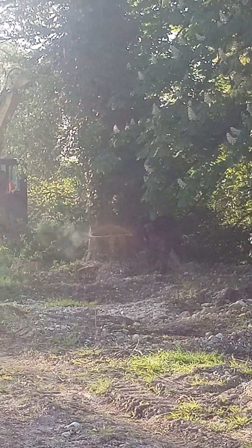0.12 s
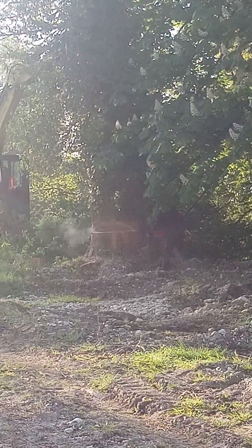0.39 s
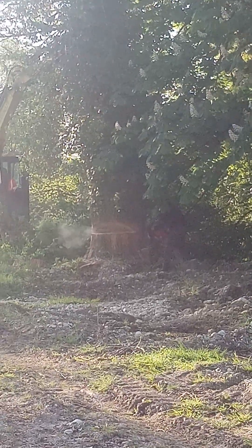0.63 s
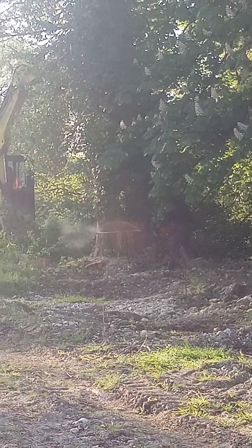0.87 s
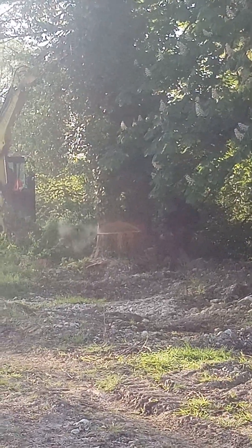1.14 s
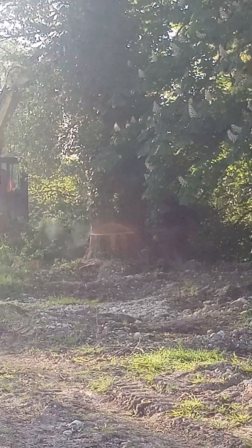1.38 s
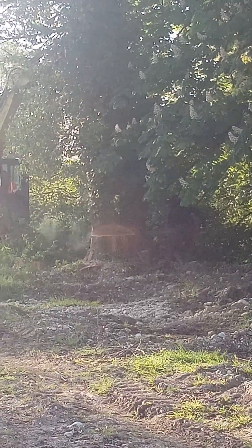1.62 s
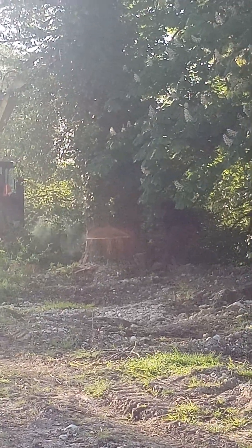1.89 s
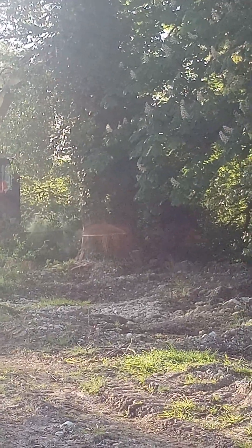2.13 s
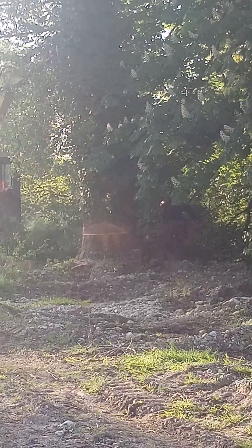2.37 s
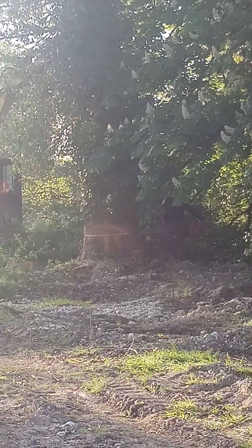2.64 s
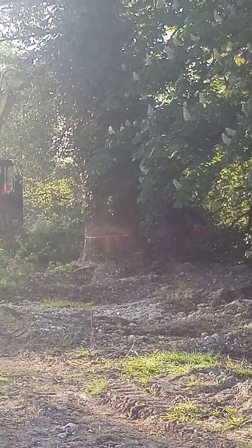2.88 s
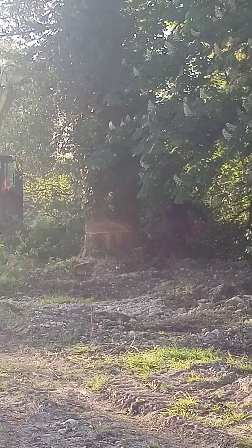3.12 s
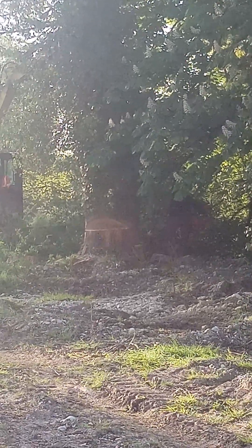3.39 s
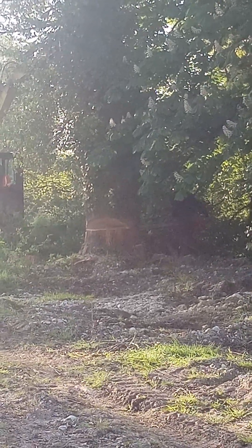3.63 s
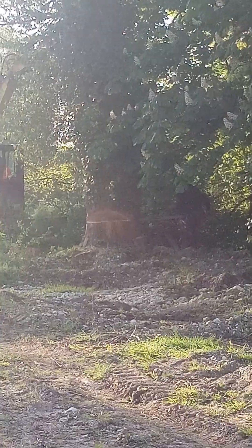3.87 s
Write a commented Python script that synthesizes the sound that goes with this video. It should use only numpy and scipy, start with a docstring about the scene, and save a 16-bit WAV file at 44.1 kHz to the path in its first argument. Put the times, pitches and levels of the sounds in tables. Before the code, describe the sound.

A chainsaw some way off revs up in a tree trunk, is released and runs down within a second or so; birds chip and trill, then loose metal rattles, over soft outdoor hiss.

```python
"""Chainsaw among the trees

A chainsaw some way off revs up in a trunk, is let go and runs down to a faint idle: sine orders of its
firing rate, muffler-shaped, with chain noise puffing at each firing. Small birds whistle, chip and trill
as gliding sines. Loose metal rattles near the work as ringing modes. Saw and birds echo off the trunks,
over a soft background hiss.
"""
import sys
import numpy as np
from scipy import signal
from scipy.io import wavfile
from scipy.ndimage import uniform_filter1d

SR = 44100
rng = np.random.default_rng(int(sys.argv[2]) if len(sys.argv) > 2 else 0)


def dump_mix(stems):
    """Bounce the given channels to the path in sys.argv[1] as a 16-bit WAV at rate SR."""
    frames = np.atleast_2d(stems).T  # one column per channel
    limited = np.clip(frames, -1, 1)  # hard clip at full scale
    pcm = np.round(limited * 32767).astype(np.int16)
    wavfile.write(sys.argv[1], SR, pcm)


def amplitude_ratio(level_db):
    """Convert a level in decibels to the matching linear amplitude (field) ratio."""
    exponent = np.asarray(level_db, float) / 20
    return 10 ** exponent


N = 176400  # samples, 4 s


def evened(x):
    """Scales a signal to rms 1."""
    return x / np.sqrt(np.mean(x ** 2) + 1e-20)


def add(mix, start_s, sound):
    """Lays a sound into the mix at a time, cut off at the end of the mix."""
    part = mix[round(start_s * SR):][:len(sound)]
    part += sound[:len(part)]


def sine(turns):
    """A sine wave of rms 1 from its phase in turns."""
    return np.sqrt(2) * np.cos(2 * np.pi * turns)


def drift(rate_hz):
    """Smooth random wandering of rms about 1: averaged noise knots joined by straight lines."""
    knots = uniform_filter1d(rng.standard_normal(int(N / SR * rate_hz * 4) + 8), size=4)
    return np.interp(np.arange(N) / SR * rate_hz * 4, np.arange(len(knots)), evened(knots))


def hiss(colour, patchy_db, band=(0, 22050)):
    """Noise of a given colour whose spectrum swells and thins in drifting patches, rms 1 inside band."""
    hz = np.fft.rfftfreq(1024, 1 / SR)
    points_hz, points_db = np.transpose(colour)
    colour_db = np.interp(np.log(hz + 1), np.log(points_hz + 1), points_db)
    real, imaginary, patches = rng.standard_normal((N // 256 + 5, 513, 3)).T
    patches = uniform_filter1d(patches, size=9, axis=0)  # across frequency
    patches = evened(uniform_filter1d(patches, size=4, axis=1))  # across time
    spectrum = (real + 1j * imaginary) * amplitude_ratio(colour_db[:, None] + patchy_db * patches)
    inside = (hz >= band[0]) & (hz <= band[1])
    share = (abs(spectrum[inside]) ** 2).sum() / (abs(spectrum) ** 2).sum()
    noise = signal.istft(spectrum, nperseg=1024, noverlap=768)[1][:N]
    return evened(noise) / np.sqrt(share)


# The run of the saw: (time [s], firing rate [Hz], firing tone level [dB], its octave level [dB],
# 11th order level [dB], fan-fin whine level [dB], chain in wood level [dB], other overtones level [dB])
SAW_RUN = [(0, 126, -35, -39, -72.5, -38.5, -44, -33),
           (.235, 132.9, -39.5, -41.5, -60, -45.5, -43.5, -39.5),
           (0.312, 147.5, -33, -42.5, -46, -28, -45.5, -33),
           (0.39, 158, -26.5, -38, -39.5, -42.5, -40, -32.5),
           (0.449, 166, -39, -34, -30, -27, -43.5, -49.5),
           (0.582, 169.4, -36.5, -45.5, -32, -31.5, -43.5, -26.5),
           (0.698, 165, -35.5, -41.5, -31.5, -27, -44.5, -23),
           (0.766, 160.8, -36.5, -26.5, -37, -29.5, -41, -26.5),
           (0.811, 157.3, -36, -56, -75, -23, -42.5, -28),
           (0.843, 142, -47.5, -53, -59, -33.5, -47.5, -35.5),
           (0.929, 106.3, -50, -50, -90, -78, -48.5, -38.5), (1.158, 65, -71, -53, -82, -91, -53, -41),
           (1.499, 46, -79, -71, -78.5, -90, -60, -49)]


def saw():
    """Engine orders locked to the firing rate, a fan whine, exhaust overtones and the chain in wood."""
    t = np.arange(N) / SR
    time_s, *columns = np.transpose(SAW_RUN)
    run = [np.interp(t, time_s, column) for column in columns]
    hz, first_db, second_db, eleventh_db, fan_db, chain_db, overtones_db = run
    fade_db = -15 * np.maximum(t - time_s[-1], 0)  # the idle sinks after the last row
    jitter = 0.00373  # rms share of the firing rate
    turns = np.cumsum(hz * (1 + jitter * drift(30.67))) / SR
    effort = (hz / hz.max()) ** 2
    tones = firing_tones(turns, {1: first_db, 2: second_db, 11: eleventh_db, 15: fan_db}, fade_db)
    overtones = exhaust(turns, hz, effort, overtones_db + fade_db / 3)
    chain = amplitude_ratio(chain_db + fade_db) * chain_in_wood(turns, effort)
    return tones + overtones + coasting(t, turns, fade_db) + pipe_ring(t) + chain


def firing_tones(turns, order_db, fade_db):
    """Sines at multiples of the firing rate; the high whines (11th and 15th) flutter in level."""
    flutter_db = 2
    out = np.zeros(N)
    for order, level_db in order_db.items():
        flutter = flutter_db * drift(45.05) if order > 2 else 0
        out += amplitude_ratio(level_db + fade_db + flutter) * sine(order * turns + rng.random())
    return out


# What the muffler lets through: (centre [Hz], half width at half amplitude [Hz], gain [dB])
MUFFLER_PASS = [(346, 66, -20), (501.7, 13, -21.5), (896, 19.4, -22.5), (2110, 280, -21), (2892, 71, -11.5)]


def exhaust(turns, hz, effort, throttle_db):
    """The other orders up to the 21st, each as loud as the muffler lets its present pitch through."""
    waver_db = 7.5  # at top speed
    growl_hz, growl_width_hz, growl_db = 1030, 320, -16.5
    full_surge = 47  # Hz per s of speeding up
    speeding_up = uniform_filter1d(np.gradient(hz) * SR, size=2000)
    surge = np.clip(speeding_up / full_surge, 0, 1) ** 2
    out = np.zeros(N)
    for order in range(3, 22):
        if order in (11, 15):  # these have levels of their own
            continue
        pipe = amplitude_ratio(-41)  # leaks through everywhere
        for centre_hz, width_hz, gain_db in MUFFLER_PASS:
            pipe = pipe + amplitude_ratio(gain_db) / (1 + ((order * hz - centre_hz) / width_hz) ** 4)
        # low overtones swell while the engine gathers speed
        pipe += surge * amplitude_ratio(growl_db) / (1 + ((order * hz - growl_hz) / growl_width_hz) ** 4)
        waver = amplitude_ratio(waver_db * drift(9.14) * effort)
        out += amplitude_ratio(throttle_db) * pipe * waver * sine(order * turns + rng.random())
    return out


def coasting(t, turns, fade_db):
    """With the throttle shut, the fourth order sings on while the engine runs down."""
    start_s, start_db, slope_db_per_s = 0.96, -55, -4
    level = (t > start_s) * amplitude_ratio(start_db + slope_db_per_s * (t - start_s) + fade_db)
    return uniform_filter1d(level, size=4000) * sine(4 * turns)


def pipe_ring(t):
    """The pipe rings as the throttle shuts: a short sine under a bell-shaped swell."""
    centre_s, half_length_s, ring_hz, peak_db = 0.81, 0.028, 818, -39
    swell = np.exp(-((t - centre_s) / half_length_s) ** 2)
    return amplitude_ratio(peak_db) * swell * np.sin(2 * np.pi * ring_hz * t)


# Colour of the chain noise: (frequency [Hz], relative density [dB])
CHAIN_COLOUR = [(120, -42), (200, -8.5), (472, -27), (655, -15), (1090, -19.5), (2230, -2), (4220, -11.5),
                (5350, -4), (7850, -35.5), (14000, -42.5), (15600, -27)]


def chain_in_wood(turns, effort):
    """Chain noise with ringing bands in it, puffing once per firing; rms 1 from 3300 to 4800 Hz
    before the bands are added."""
    puff = evened(1 + 0.5 * np.cos(2 * np.pi * turns))
    noise = hiss(CHAIN_COLOUR, patchy_db=3.5, band=(3300, 4800))
    return puff * (noise + effort * ringing_bands())


# Narrow ringing bands in the chain noise, loudest near 5300 Hz:
# (centre [Hz], width [Hz], level against the chain noise [dB])
RINGING_BANDS = [(3035, 190, 0.5), (3720, 50, -2), (4750, 120, -5), (5310, 103, 9.5)]


def ringing_bands():
    """Narrow ringing bands in the chain noise, whose levels come and go."""
    patchy_db = 4
    return sum(wandering_band(hz, width_hz) * amplitude_ratio(level_db + patchy_db * drift(20))
               for hz, width_hz, level_db in RINGING_BANDS)


def wandering_band(hz, width_hz):
    """Low-passed noise pairs turned up to a band whose pitch wanders a little, rms 1."""
    wander = 0.015  # rms share of the pitch
    b, a = signal.butter(2, width_hz / SR)  # cutoff at half the width
    angle = 2 * np.pi * np.cumsum(hz * (1 + wander * drift(9))) / SR
    i, q = signal.lfilter(b, a, rng.standard_normal((2, N)))
    return evened(i * np.cos(angle) + q * np.sin(angle))


# The calls in order: (start [s], length [s], level [dB], song shape)
BIRD_NOTES = [(0.01, 0.074, -51, "see"), (0.229, 0.052, -50, "see"), (0.442, 0.084, -57, "see"),
              (0.942, 0.1, -29, "flat"), (1.073, 0.086, -47.5, "hook"), (1.207, 0.0893, -49.5, "hook"),
              (1.487, 0.12, -52.5, "dip"), (1.623, 0.0814, -34.5, "bend"), (2.598, .15, -57.5, "arch"),
              (2.784, 0.051, -29.5, "chip"), (2.918, 0.096, -48, "sag"), (3.174, .115, -54.5, "arch"),
              (3.321, 0.038, -23.5, "chip"), (3.393, 0.12, -56.5, "arch"), (3.543, 0.035, -22.5, "chip"),
              (3.569, 0.14, -39.5, "warble"), (3.72, 0.056, -46.5, "trill"), (3.721, 0.13, -37, "rise"),
              (3.888, 0.061, -30, "low")]


def birds():
    """Single notes, plus one trill."""
    out = trill()
    for start_s, length_s, level_db, shape in BIRD_NOTES:
        sound = note(shape, length_s, level_db)
        if shape == "warble":  # hoarse: the whistle is broken up by fast chance
            sound = sound * drift(160)[:len(sound)]
        add(out, start_s, sound)
    return out


def trill():
    """A run of quick upward slides that sinks a little in pitch and level, each slightly off."""
    start_s, step_s, length_s, count = 1.729, 0.0471, 0.023, 17
    first_db, sag = -47, 0.03  # sag: share of the pitch lost over the run
    out = np.zeros(N)
    for k in range(count):
        level_chance, pitch_chance = rng.standard_normal(2)
        level_db = first_db - k / 4 + 2 * level_chance
        pitch = 1 - sag * (k / count + pitch_chance / 2)
        add(out, start_s + k * step_s, note("trill", length_s, level_db, pitch))
    return out


# Song shapes by name: (share of the note's length, pitch [Hz], level against the note's own [dB])
SONG_SHAPES = dict( see=[(0, 7705, -27), (.4, 7414, -2), (1, 7280, -8)], flat=[(0, 5120, -32),
               (.4, 5105, 2.5), (1, 5060, -13)], hook=[(0, 6400, -5), (.16, 6760, -2), (.58, 6410, -2),
               (.82, 5310, 12), (1, 4110, -21)], dip=[(0, 7500, -3), (.1, 8130, -17), (.28, 6936, 7.5),
               (1, 7510, -17)], bend=[(0, 5456, -18), (.18, 5605, 3), (.6, 5684, 4.5), (.76, 5220, 6.5),
               (1, 4105, -53.5)], trill=[(0, 4250, -12), (.75, 5000, 2), (1, 5200, -6)],
               warble=[(0, 5280, 4), (.35, 5890, -7), (.55, 5100, -4), (1, 5360, -10)],
               arch=[(0, 6900, -29), (.12, 7940, 2.5), (.55, 8370, -17), (.87, 7700, -6), (1, 6910, -21)],
               chip=[(0, 5893, -28), (.28, 5510, -10), (.42, 5290, 3.5), (.56, 4900, -19), (1, 3900, -33)],
               sag=[(0, 6790, -59), (.08, 7340, -3), (.92, 6900, 5), (1, 6790, -23.5)],
               rise=[(0, 5370, -16), (.28, 6520, 3), (.8, 6540, -1), (1, 6340, -17)], low=[(0, 4870, -36),
               (.3, 4705, -1.5), (1, 4450, -13.5)])


def note(shape, length_s, level_db, pitch=1):
    """A near-sine whistle gliding along one song shape; pitch scales its frequencies."""
    place = np.arange(0, length_s, 1 / SR) / length_s
    at, hz, shape_db = np.transpose(SONG_SHAPES[shape])
    glide_hz = pitch * uniform_filter1d(np.interp(place, at, hz), size=len(place) // 12 + 1)
    edge = np.clip(np.minimum(place, 1 - place) * 30, 0, 1)
    level = edge * amplitude_ratio(level_db + np.interp(place, at, shape_db))
    return np.sqrt(2) * level * np.sin(2 * np.pi * np.cumsum(glide_hz) / SR)


# What the loose metal rings with: (frequency [Hz], level [dB], t60 [s])
METAL_MODES = [(1428, -6.5, 0.048), (2169, 6, 0.05), (2457, 1.5, 0.17), (3093, 2.5, 0.1), (3265, 2.5, 0.1),
               (3920, -4.5, 0.12), (5344, 3.5, 0.085), (11520, -32, 0.078)]
# How hard it shakes: (time [s], rattle level [dB])
SHAKING = [(1.7, -56.5), (2.05, -52), (2.5, -44), (3, -41.5), (3.5, -41), (4, -46)]
# Single harder hits: (time [s], strength [dB])
METAL_KNOCKS = [(2.168, -49), (2.2927, -45.5), (2.4049, -48), (2.54, -35.5), (2.7533, -40), (2.9856, -42),
                (3.1025, -34), (3.3427, -41), (3.545, -43), (3.679, -45)]


def rattle():
    """Many small ticks and a few knocks; each rings the modes of the metal in its own proportions."""
    ticks_per_s, tick_spread_db, mode_spread_db, burst_db = 450, 3.5, 6.5, 4.5
    rise_s, crack_db, crack_decay_s = 0.002, -5, 0.016
    detune = 0.014  # share of the pitch
    t, ring_t = np.arange(N) / SR, np.arange(8000) / SR
    at = np.flatnonzero(rng.random(N) < ticks_per_s / SR)
    size_db = tick_spread_db * np.minimum(rng.exponential(1, (len(at), 1)), 4)
    size_db = size_db + mode_spread_db * rng.standard_normal((len(at), len(METAL_MODES)))
    knock_db = np.array(METAL_KNOCKS)[:, 1:]
    knock_db = knock_db + 3.5 * rng.standard_normal((len(METAL_KNOCKS), len(METAL_MODES)))
    attack = np.sin(np.pi / 2 * np.minimum(ring_t / rise_s, 1)) ** 2
    ticks, knocks = np.zeros(N), np.zeros(N)
    for k, (hz, level_db, t60) in enumerate(METAL_MODES):
        pieces_hz = hz * (1 + detune * np.arange(-1, 2)[:, None])  # three like pieces, not quite in tune
        rings = attack * amplitude_ratio(level_db - 60 * ring_t / t60) * np.sin(2 * np.pi * pieces_hz * ring_t)
        train = np.zeros((len(rings), N))
        train[at % len(rings), at] = amplitude_ratio(size_db[:, k] + burst_db * drift(7)[at])
        ticks += signal.oaconvolve(train, rings, axes=1)[:, :N].sum(0)
        for row, (time_s, _) in enumerate(METAL_KNOCKS):
            add(knocks, time_s, amplitude_ratio(knock_db[row, k]) * rings.mean(0))
    # each knock starts with a short crack of noise
    crack_noise = hiss(CHAIN_COLOUR, patchy_db=0.49)
    crack_shape = np.minimum(ring_t / rise_s, 1) * np.exp(-ring_t / crack_decay_s)
    for time_s, strength_db in METAL_KNOCKS:
        piece = crack_noise[round(time_s * SR) - 8000:][:8000]
        add(knocks, time_s, amplitude_ratio(strength_db + crack_db) * crack_shape * piece)
    slow = np.sqrt(uniform_filter1d(ticks ** 2, size=8000) + 1e-12)  # running rms
    shake = amplitude_ratio(np.interp(t, *np.transpose(SHAKING), left=-90))
    return shake * ticks / slow + knocks


def trees(x, t60):
    """Scattered echoes off trunks: sparse taps of random sign, dying away over t60 seconds."""
    taps = np.zeros(SR)
    at = np.arange(500, SR - 20, 20)
    taps[at + rng.integers(0, 20, len(at))] = rng.choice([-1., 1.], len(at))
    taps *= amplitude_ratio(-60 * np.arange(SR) / SR / t60)
    return signal.fftconvolve(x, taps / np.linalg.norm(taps))[:N]


# Colour of the background hiss as heard through the microphone, with its peaks near 2.5 and 5.5 kHz:
# (frequency [Hz], relative density [dB])
BACKGROUND_COLOUR = [(30, -41), (55, 3.5), (200, 7), (520, -8), (1700, -4), (2450, 4), (4000, -8),
                     (5500, -0.5), (6300, -6), (7800, -33.5), (15700, -37.5)]


def background_hiss():
    """A steady, faintly patchy hiss behind everything."""
    return amplitude_ratio(-47) * hiss(BACKGROUND_COLOUR, patchy_db=1.83)


def scene():
    """Saw and birds, dry and echoed, with the rattle and the background hiss, in mono."""
    engine, song = saw(), birds()
    echoes = amplitude_ratio(-10.5) * trees(engine, t60=0.49) + amplitude_ratio(-9) * trees(song, t60=0.13)
    return (engine + song + echoes + rattle() + background_hiss())[None]


def top_cut(x):
    """Nothing passes above the cut-off."""
    return signal.sosfilt(signal.butter(12, 16720, fs=SR, output="sos"), x)


def record(dry):
    """A steep low-pass at 15720 Hz takes off the very top."""
    low_pass = signal.firwin(1023, 15720, window=("kaiser", 9), fs=SR)
    mix = signal.oaconvolve(dry, low_pass[None], "same")
    return top_cut(mix)


dry = scene()
out = record(dry)
dump_mix(out)
```